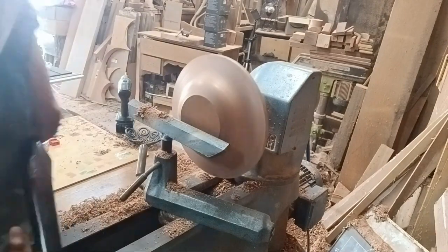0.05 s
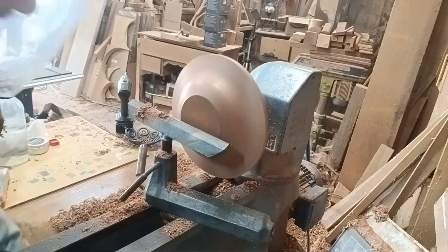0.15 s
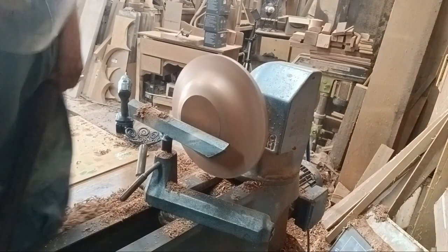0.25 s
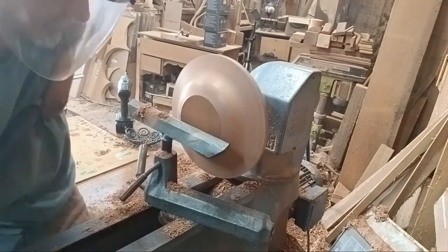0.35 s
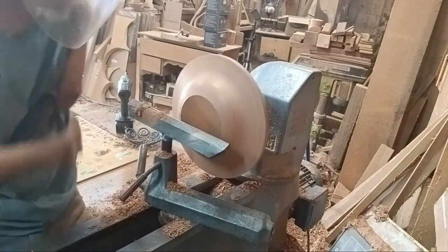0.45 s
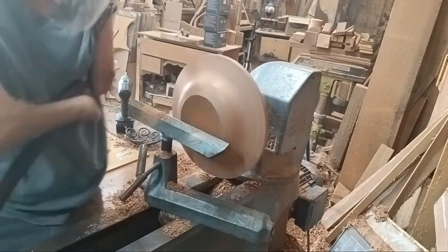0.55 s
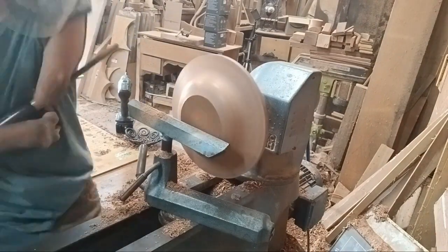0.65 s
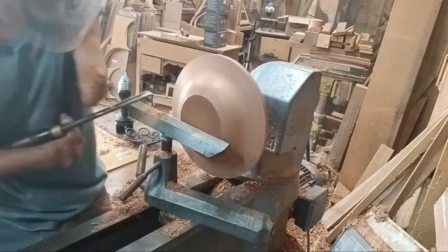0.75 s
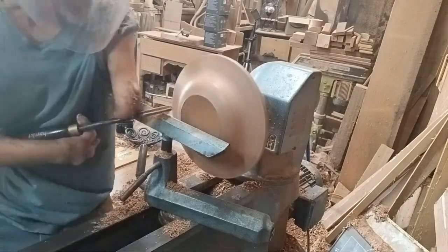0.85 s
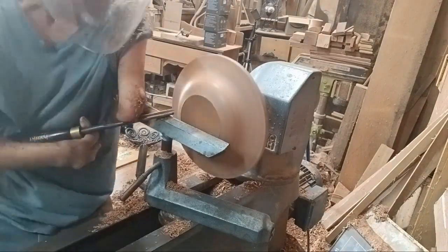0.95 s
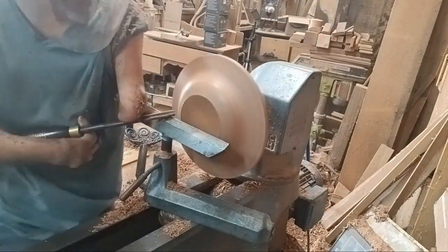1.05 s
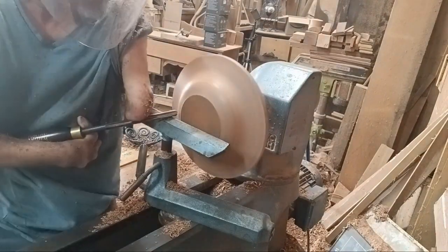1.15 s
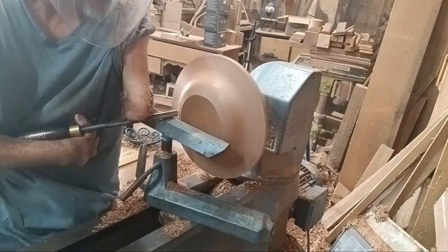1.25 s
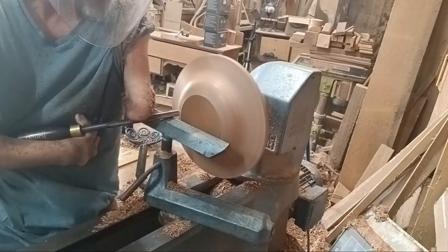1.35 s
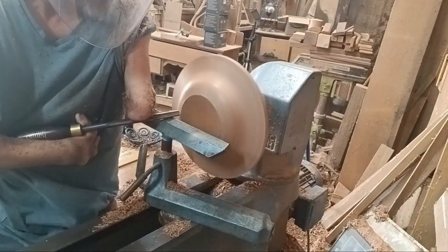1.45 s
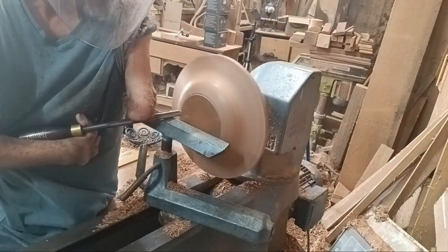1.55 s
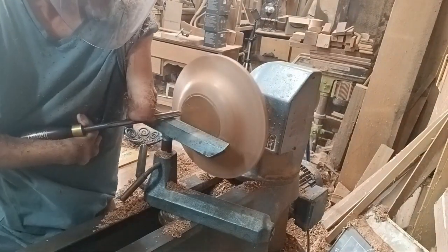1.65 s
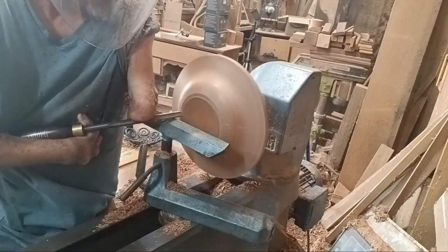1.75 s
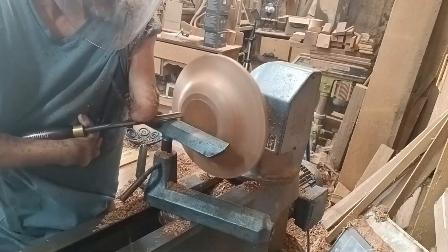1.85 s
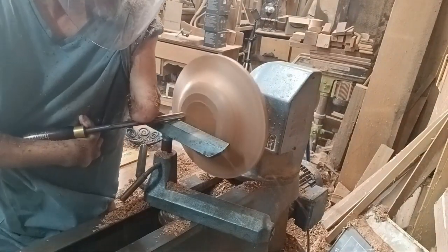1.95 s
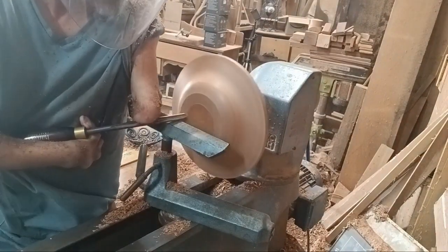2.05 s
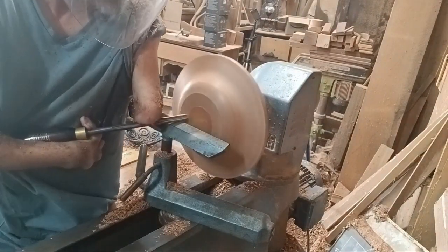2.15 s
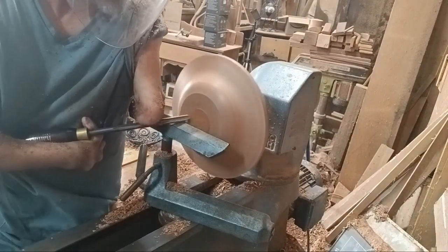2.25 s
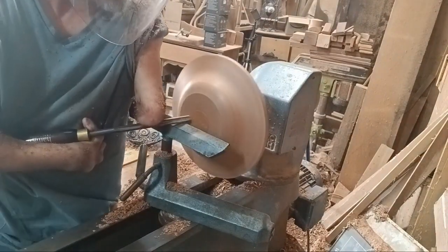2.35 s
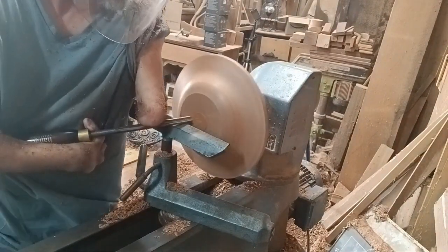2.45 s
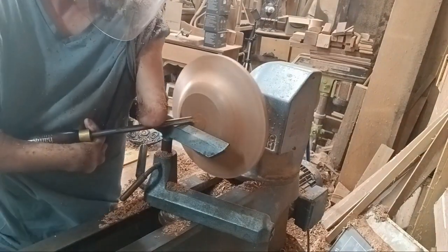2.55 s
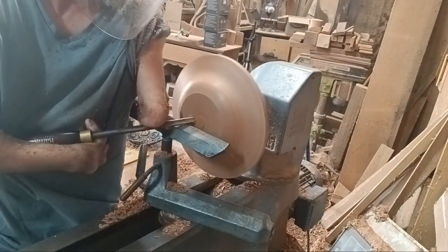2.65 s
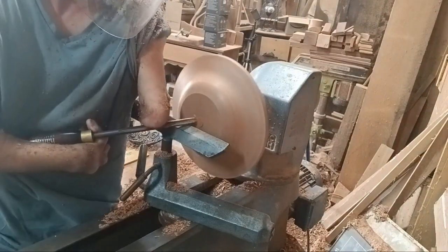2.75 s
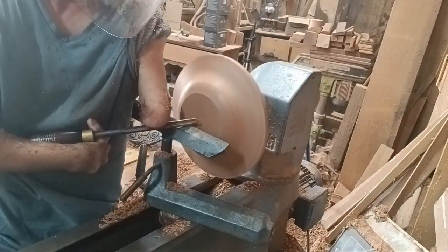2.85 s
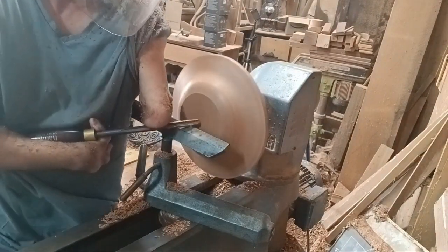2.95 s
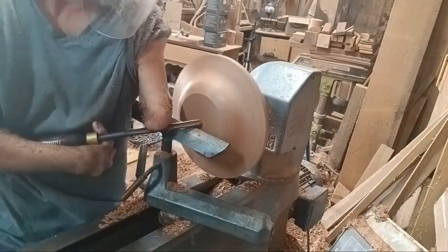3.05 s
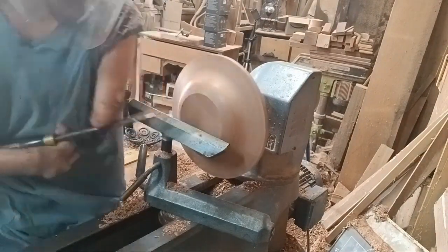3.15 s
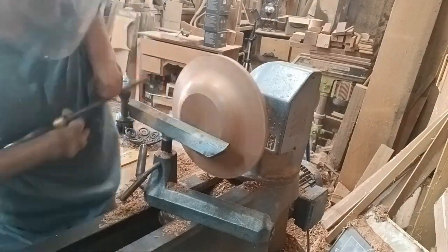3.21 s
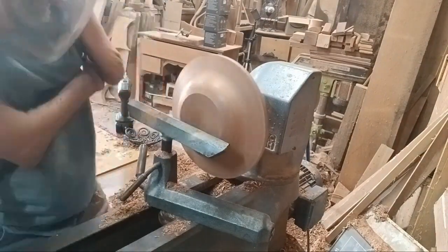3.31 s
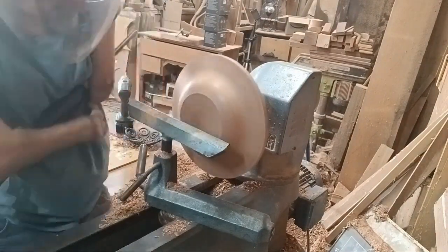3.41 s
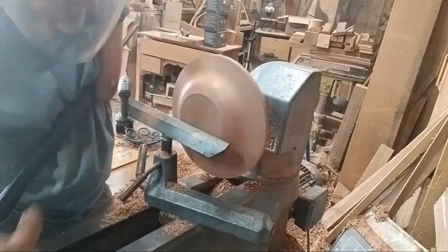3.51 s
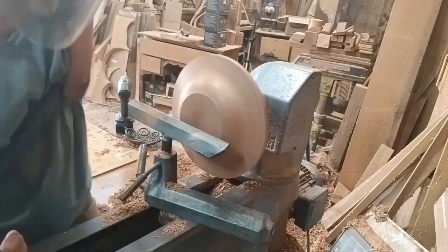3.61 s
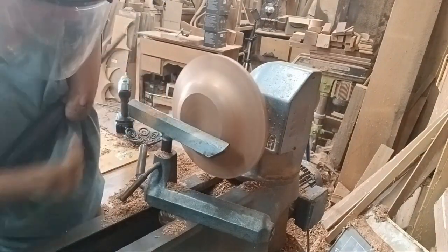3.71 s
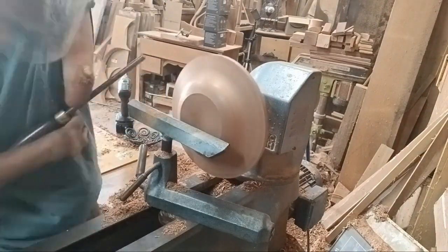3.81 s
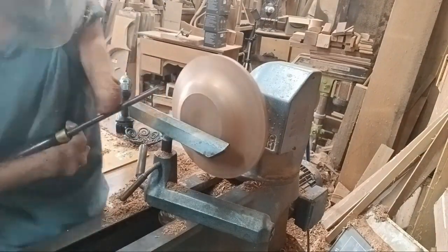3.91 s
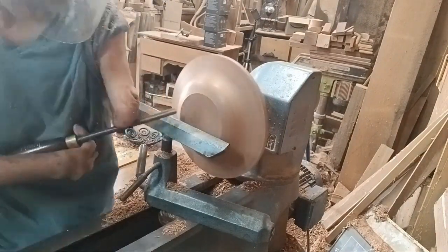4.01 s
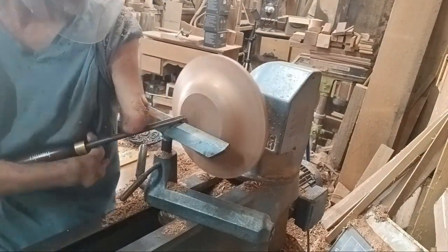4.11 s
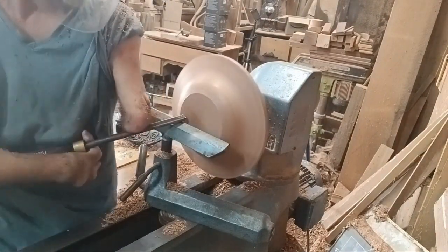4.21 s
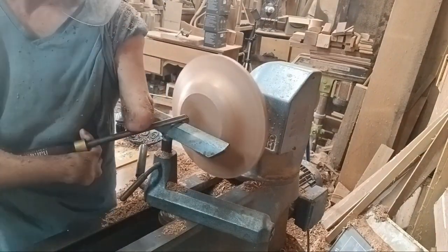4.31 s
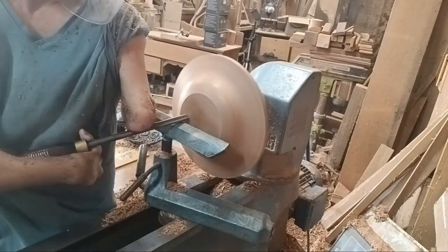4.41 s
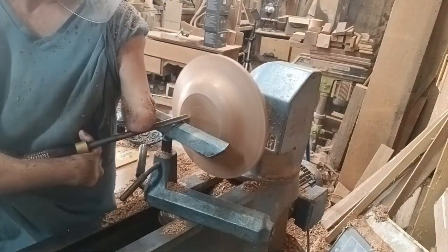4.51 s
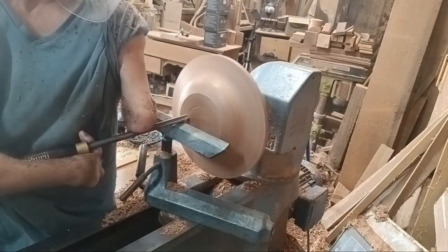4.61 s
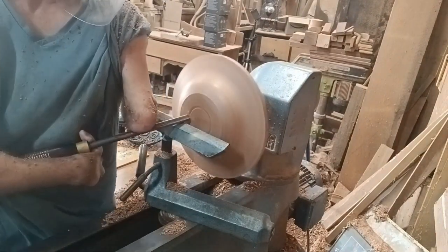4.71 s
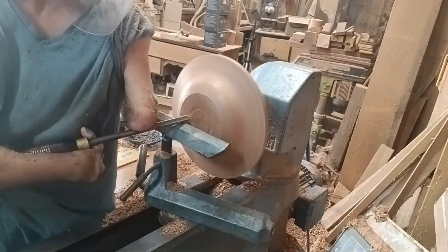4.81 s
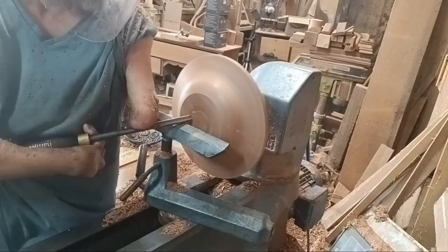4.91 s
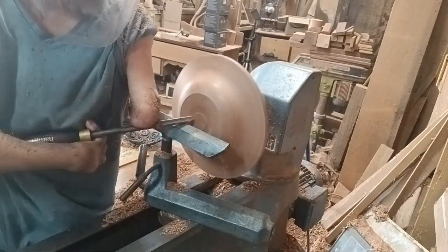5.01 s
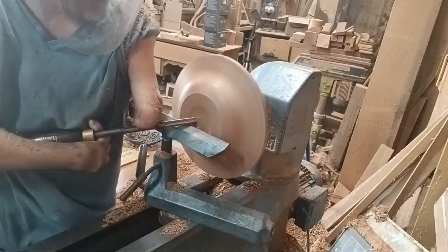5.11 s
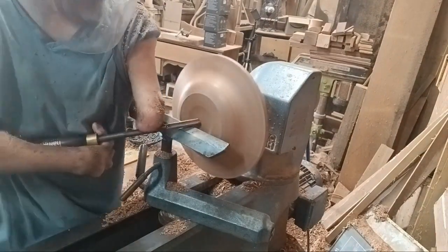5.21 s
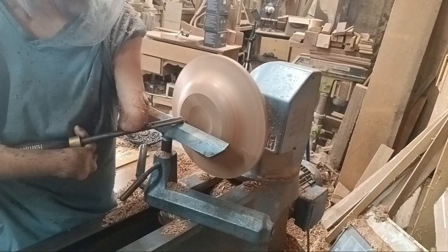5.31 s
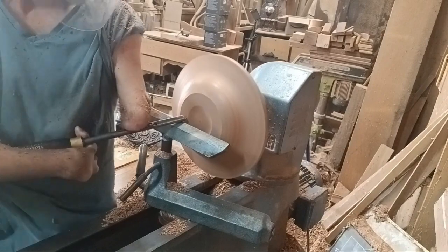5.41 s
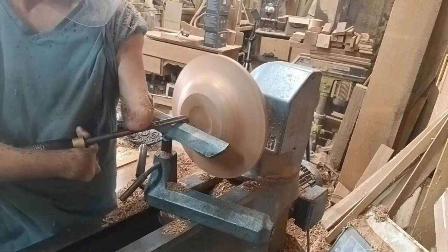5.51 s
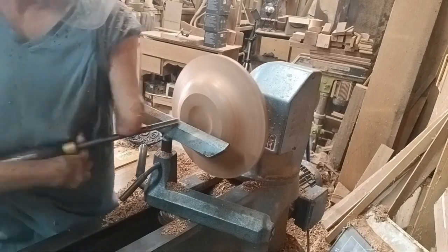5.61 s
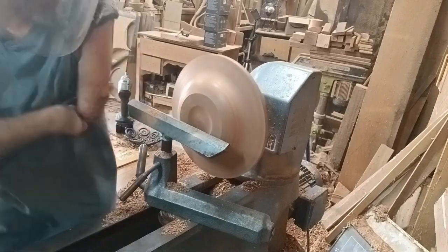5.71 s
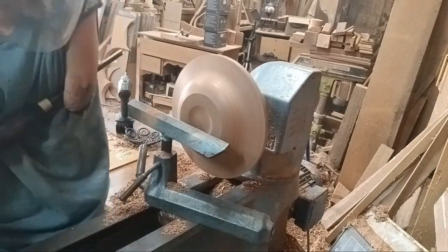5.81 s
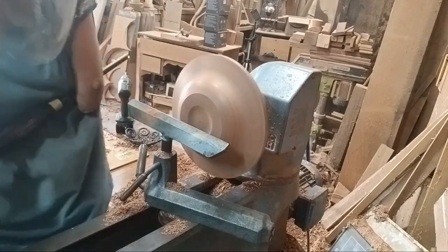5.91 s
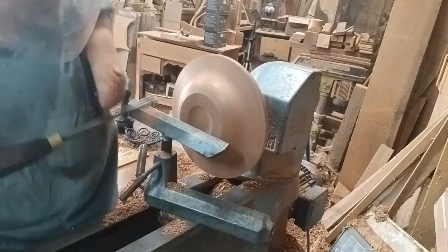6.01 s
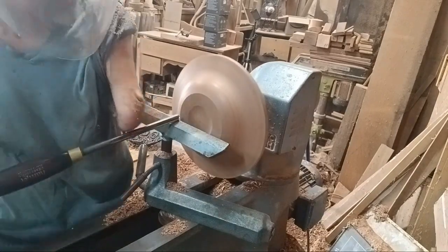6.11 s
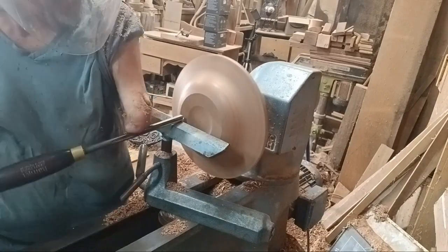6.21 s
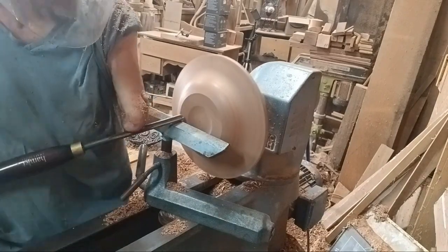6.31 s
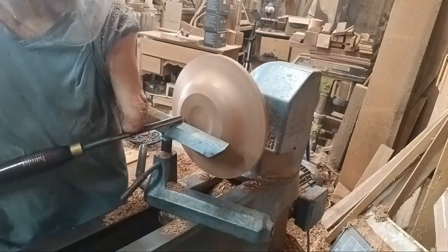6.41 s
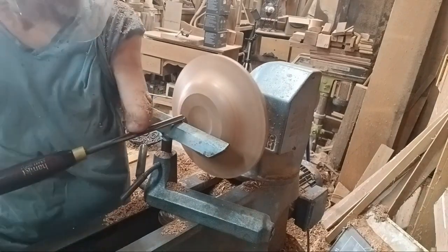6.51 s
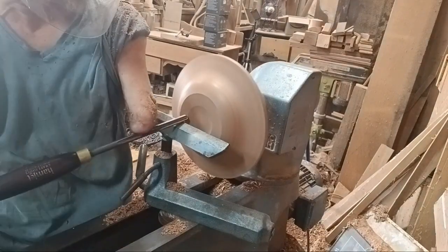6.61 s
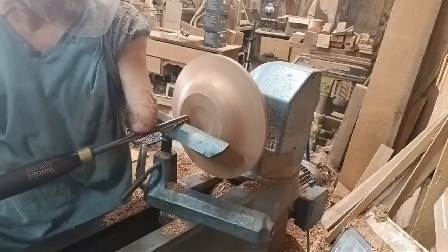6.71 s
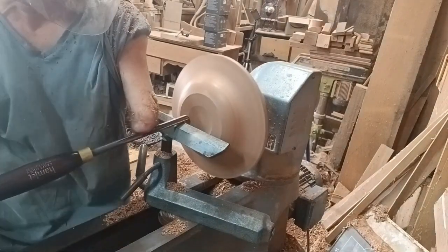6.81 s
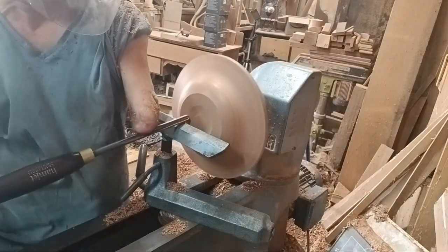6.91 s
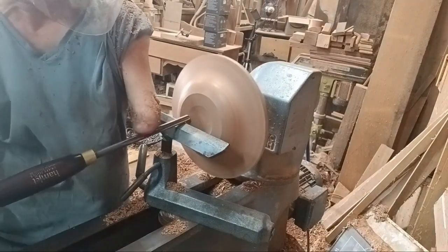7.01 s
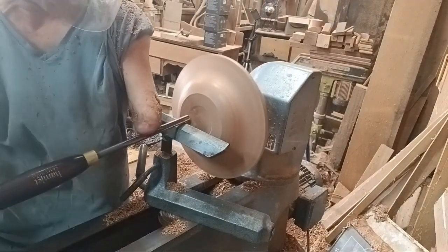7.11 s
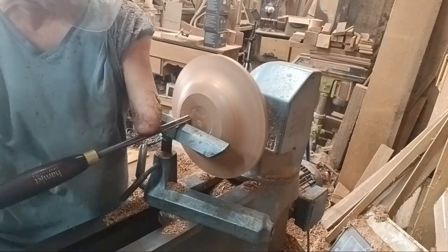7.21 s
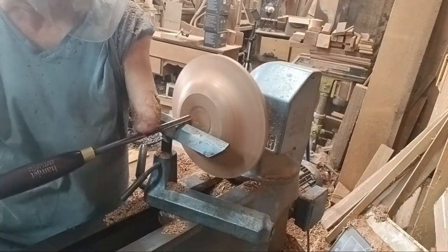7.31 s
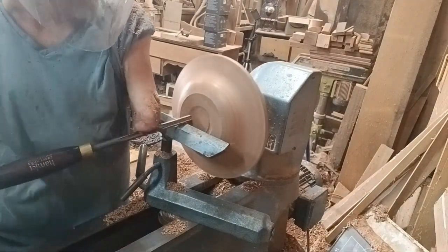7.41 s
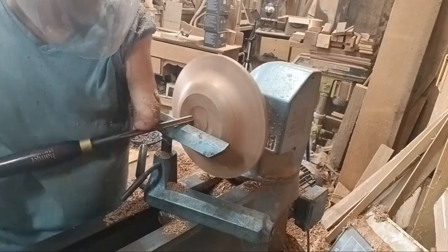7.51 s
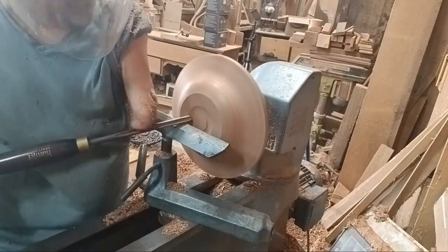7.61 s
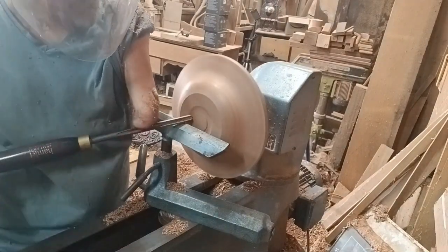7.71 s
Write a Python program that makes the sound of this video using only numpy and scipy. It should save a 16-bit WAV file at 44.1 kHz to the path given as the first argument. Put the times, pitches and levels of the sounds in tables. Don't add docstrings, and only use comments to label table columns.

```python
import sys
import numpy as np
from scipy import signal
from scipy.io import wavfile
from scipy.ndimage import uniform_filter1d

SR = 44100
rng = np.random.default_rng(int(sys.argv[2]) if len(sys.argv) > 2 else 0)


def to_linear_factor(level_db):
    exponent = np.asarray(level_db, float) / 20
    return 10 ** exponent


def file_out(sig):
    cols = np.atleast_2d(sig).T
    lim = np.clip(cols, -1, 1)
    pcm = np.round(lim * 32767).astype(np.int16)
    wavfile.write(sys.argv[1], SR, pcm)


N = 341775
TIME_S = np.arange(N) / SR

# pitch_hz, likeness (0-1)
SAME = [(40, .75), (100, .8), (160, .98), (330, .95), (600, .5), (1000, .55), (2200, .45), (3500, .3),
        (16000, .2)]


def evened(x):
    return x / np.sqrt(np.mean(x ** 2) + 1e-20)


def read(points, hz):
    f, value = np.transpose(points)
    return np.interp(np.log(hz + 1), np.log(f + 1), value)


def passed(x, hz, kind):
    return signal.sosfilt(signal.butter(6, hz, kind, fs=SR, output="sos"), x)


def drift(hz):
    steps = rng.standard_normal(N // 32 + 1)
    slow = signal.sosfiltfilt(signal.butter(2, hz, fs=SR / 32, output="sos"), steps)
    return evened(np.repeat(slow, 32)[:N])


def panned(lr_db):
    return to_linear_factor([[lr_db / 2], [-lr_db / 2]])


def pair(spectrum, balance, lag, patchy_db, direct=0.):
    bin_hz = np.fft.rfftfreq(1024, 1 / SR)
    a, b, c, d, patches = rng.standard_normal((N // 256 + 5, 513, 5)).T
    patches = uniform_filter1d(patches, size=10, axis=0)
    patches = evened(uniform_filter1d(patches, size=10, axis=1))
    same = np.clip(np.maximum(read(SAME, bin_hz), direct), 0, 1)[:, None]
    late = np.exp(-2j * np.pi * bin_hz * lag / SR)[:, None]
    right = a + 1j * b
    left = same * late * right + np.sqrt(1 - same ** 2) * (c + 1j * d)
    tilt_db = np.array([.5, -.5])[:, None, None] * read(balance, bin_hz)[:, None]
    colour_db = read(spectrum, bin_hz)[:, None] + patchy_db * patches + tilt_db
    z = np.array([left, right]) * to_linear_factor(colour_db)
    return evened(signal.istft(z, nperseg=1024, noverlap=768)[1][:, :N])


def ring(x, hz, width):
    r = np.exp(-np.pi * abs(width) / SR)
    angle = 2 * np.pi * hz / SR
    rung = signal.lfilter([1 - r * r], [1, -2 * r * np.cos(angle), r * r], x)
    return rung * np.sin(angle) / (1 + r) * 2


def motor():
    # pitch_hz, level_db (per Hz)
    idle_spectrum = [(22, -34), (45, -64), (95, -29.5), (200, -4), (340, -16), (700, -13), (1200, -11.5),
                     (1700, -10.5), (3100, -9.5), (7200, -18.5), (8700, -17), (10500, -22.5),
                     (14500, -43.5), (16000, -21)]
    # pitch_hz, left_right_db
    idle_balance = [(60, -16), (180, -9), (550, 2), (1650, 1.5), (4970, 2.5), (15000, -14.5)]
    # pitch_hz, width_hz, level_db (rms), steady_share (0-1), left_right_db
    tones = [(48, 14, -49, 0, 1), (64, 12, -49.5, 0, 1), (148, 35, -46, 0, 0), (210, 9, -42.5, .5, 0),
             (296, 24, -48.5, 0, 0), (465, 7, -47.5, .85, 0), (575, 8, -62, .3, 0), (860, 50, -58, 0, 0),
             (937, 8, -54, .6, 8), (7675, 20, -53, .3, 0), (7760, 8, -60, .5, 0), (7835, 12, -47, .8, 0),
             (7914, 14, -41, .85, 0), (8075, 8, -51.5, .8, 0)]
    lag = 21
    stray = .0008
    level_db = -28 - 2.5 + 0.56 * drift(44.0)
    out = to_linear_factor(level_db) * pair(idle_spectrum, idle_balance, lag, patchy_db=1.0)
    noise = rng.standard_normal((2, N))
    clock_s = np.cumsum(1 + stray * np.pad(drift(5.), (0, lag), "edge")) / SR
    for hz, width, db, share, lr_db in tones:
        steady = np.sqrt(2 * share) * np.cos(2 * np.pi * hz * clock_s)
        fuzz = np.sqrt(1 - share) * evened(ring(ring(noise[0], hz, width), hz, 3 * width))
        diffuse_gain = min(np.sqrt(1 - read(SAME, hz) ** 2), .4)
        diffuse = diffuse_gain * evened(ring(noise[1], hz, 2 * width))
        left = np.roll(fuzz, lag) + steady[:N] + diffuse
        right = fuzz + steady[lag:]
        out += to_linear_factor(db) * panned(lr_db) * np.array([left, right])
    return out


def knocks():
    # start_s, level_db (peak), left_right_db, crack_db (over the ring)
    blows = [
        (0.156, -23.5, 2, -10),
        (0.26, -4.5, 6, -9.5),
        (3.101, -16.5, 4, -3),
        (3.91, -23, 6, -12.0),
        (4.069, -10.5, 3.5, 3.5),
        (6.116, -24, 0.5, 3),
    ]
    # pitch_hz, level_db, t60_s
    blow_modes = [
        [(293, 2, 0.058), (403, -3, 0.03)],
        [(372, -22, 0.14), (734, -7, 0.016), (842, -2.5, 0.05), (945, -8.5, 0.063), (1362, 1.5, 0.053),
         (1860, 2, 0.02), (2470, -3, .055), (3220, -4, .05), (4560, -10, .045)],
        [(680, -6, .04), (1130, 0, .045), (1260, -2, .04), (1400, -5, .04), (2500, -3, .04)],
        [(228, -3, 0.053), (510, -10, 0.13), (657, -8, 0.05), (870, -12, .04)],
        [(720, -9, .06), (1170, -2, .05), (1300, -6, .04), (2160, 0, .045), (2560, -9, .03), (2930, 0, .045),
         (4050, -5, .045), (4936, -3, .05), (6400, -5, .045), (8200, -7, .04)],
        [(806, -1, 0.048), (2530, 4, 0.033), (4930, -3, .03)],
    ]
    out, t = np.zeros((2, N)), np.arange(6000) / SR
    phases = np.cumsum(rng.uniform(-1, 1, (len(blows), 2, 10)) * [[np.pi], [1.4]], axis=1)
    cracks = rng.standard_normal((len(blows), 2, len(t)))
    cracks = passed(passed(cracks, 470.0, "high"), 9000.0, "low")
    for (s, db, lr_db, crack_db), modes, phase, crack in zip(blows, blow_modes, phases, cracks):
        hz, mode_db, t60 = np.transpose(modes)[:, :, None]
        swings = np.sin(2 * np.pi * hz * t + phase[:, :len(hz), None])
        sound = (to_linear_factor(mode_db - 60 * t / t60) * swings).sum(1)
        sound *= 1 - np.exp(-t / .003)
        burst = np.exp(-t / .006) * (1 - np.exp(-t / .001))
        sound = sound / abs(sound).max() + crack * to_linear_factor(crack_db) * burst
        at = round(s * SR)
        out[:, at:at + len(t)] += to_linear_factor(db - 1) * panned(lr_db) * sound
    return out


def gouge():
    # time_s, hiss_db (edge pressure), load (on the bowl, 0-1)
    passes = [
        [(1.425, -48, 0.0), (1.444, -23, 0.06), (1.464, -23.5, .05), (1.472, -15.5, 0.11), (1.8, -16, 0.32),
         (2.046, -13, 0.31), (2.8, -14.5, 1.0), (2.945, -24, 0.8), (2.965, -35, 0.06)],
        [(4.37, -47, 0.0), (4.41, -23, .04), (4.56, -18.5, 0.14), (4.6, -13.5, 0.18), (4.78, -13, 0.18),
         (4.89, -16, 0.28), (5.016, -14, 0.65), (5.146, -25.5, 0.68), (5.22, -40, 0.03)],
        [(6.88, -74, 0.24), (6.904, -20, 0.08), (6.98, -16, 0.09), (7.09, -17.5, 0.16), (7.15, -14, 0.23),
         (7.284, -13, 0.2), (7.46, -16, 0.45), (7.565, -17, 0.35), (7.605, -37, .03)],
        [(7.7, -52, 0.0), (7.736, -27, 0.13), (7.75, -19.5, 0.2)],
    ]
    moves_s = [1.95, 3.7, 6.0]
    ring_out_s = .04
    swing_s = 0.046
    s, *controls = np.transpose(sum(passes, []))
    hiss_db, load = (np.interp(TIME_S, s, c) for c in controls)
    load = load.clip(0, 1.2)
    place = np.searchsorted(moves_s, TIME_S).astype(float)
    contact = sum((TIME_S >= p[0][0]) & (TIME_S <= p[-1][0] + ring_out_s) for p in passes)
    touching = uniform_filter1d(contact.astype(float), size=400)
    wall_db = -22 - 21 * np.exp(-load / 0.19) + 0.27 * (hiss_db + 18.5)
    hold = np.exp(-1 / (swing_s * SR))
    swing = signal.lfilter([1 - hold], [1, -hold], load)
    drum_db = -45.5 + 30.5 * swing - 1.5 * (1 - swing) * drift(36.0)
    return touching, hiss_db, wall_db, drum_db, place


def struck(drive, modes_hz, modes_db, place, fickle_db):
    rocking = fickle_db * drift(7.)
    out = 0
    for k, ((hz, width), db) in enumerate(zip(modes_hz, modes_db)):
        level_db = np.interp(place, range(len(db)), db) + np.roll(rocking, k * N // 17)
        out = out + to_linear_factor(level_db) * ring(drive, hz, width)
    return out


def drumming(white, pulse, place):
    upper_share = (.4, .4, 1.1, 1.3)
    drum_hz = 235
    shake = evened(ring(ring(white, drum_hz, 18.), drum_hz, 70.))
    shake /= np.sqrt(uniform_filter1d((shake ** 2).mean(0), size=1500) + 0.69)
    upper = evened(ring(ring(white, 1.2 * drum_hz, 60.), 1.2 * drum_hz, 90.))
    drum = shake * (1 + .4 * pulse) + np.interp(place, range(4), upper_share) * upper
    return passed(drum, 357.0, "low")


def cutting(hiss_db, wall_db, drum_db, place):
    # pitch_hz, level_db (per Hz)
    hiss_spectrum = [(2120, -2.5), (3600, 0), (4130, -7.5), (5280, 0.5), (7850, 5.5), (8360, 3.5),
                     (9130, -1.5), (10000, -4), (11700, -17.5), (14300, -14), (16200, -74)]
    # pitch_hz, level_db (per Hz)
    wall_spectrum = [(330, -52), (560, -55), (839, 7), (1120, -6), (1300, -0.5), (1570, 1.5), (2430, -7),
                     (2620, -1), (4200, -15), (5460, -2), (9240, -120)]
    # pitch_hz, left_right_db
    cut_balance = [(60, 2), (150, 0), (380, -1), (950, 0), (2380, 0), (5500, 5.5), (15000, -8)]
    # pitch_hz, width_hz
    steel_modes = [(4940, 90), (5170, 60), (5425, 55), (5880, 140), (6515, 75), (6918, 60), (7320, 60),
                   (7435, 80), (8240, 90), (8390, 90), (8630, 70), (9810, 100), (9990, 170), (7090, 55),
                   (8880, 90), (6180, 80)]
    # level_db at tool places 0, 1, 2, 3
    steel_levels = [(3, -16, 0.5, 0), (4, -0.5, -14, -3), (-3, 2, -1.5, -1), (-22, -31, 2, 6),
                    (10, -21, 3, 1), (-10, -4, 8, 10), (-20, -8.5, 4, -19), (-14, 5.5, -44, -17),
                    (11, -5, -36, 7), (-4, -17, 5.5, -21), (-31, -26, -24, -2), (1, -11, 3, 6),
                    (-35, 1.5, -17, -8), (-5, 7, -14, -24), (3, -26, -17, -7), (-15, -22, -7, -12)]
    # pitch_hz, width_hz
    wood_modes = [(760, 70), (880, 130), (1030, 60), (1315, 90), (2100, 90), (2445, 55), (3220, 90)]
    # level_db at tool places 0, 1, 2, 3
    wood_levels = [(-4.5, 3, 5.5, -8), (-15, -4.5, -36, 1), (-13, -8, -8, -2), (-17, 0.5, 3, -0.5),
                   (-5.5, -6, -25, 1), (1.5, 4, 11, 7.5), (-7, -17, -0.5, 4)]
    lag = 42
    pulse_hz = 43
    pulse = np.cos(2 * np.pi * pulse_hz * TIME_S + .6 * drift(4.))
    throb = to_linear_factor(1.2 * pulse + 1.2 * drift(50.) + .6 * drift(300.))
    snap_sizes = to_linear_factor(3.2 * np.minimum(rng.exponential(1, N), 4))
    snaps = snap_sizes * (rng.random(N) < 400 / SR)
    bite = throb * (1 + .11 * signal.lfilter([1], [1, -.985], snaps))
    place = uniform_filter1d(place, size=15000)
    white = bite * pair([(20, 0), (20000, 0)], cut_balance, lag, patchy_db=0, direct=.6)
    steel = to_linear_factor(10.) * struck(white, steel_modes, steel_levels, place, 2.5)
    wood = to_linear_factor(13.) * struck(white, wood_modes, wood_levels, place, 2.)
    fibres = bite * pair(hiss_spectrum, cut_balance, lag, patchy_db=0.5)
    hiss = evened(passed(fibres + steel, 1900.0, "high"))
    body = bite * pair(wall_spectrum, cut_balance, lag, patchy_db=1.5)
    wall = evened(passed(body + wood, 702.0, "high"))
    drum = to_linear_factor(drum_db) * evened(drumming(white, pulse, place))
    return to_linear_factor(hiss_db) * hiss + to_linear_factor(wall_db) * wall + passed(drum, 185., "high")


def ducked(idle, touching):
    # start_s, deepest_s, end_s, depth_db
    gain_dips = [
        (1.404, 1.78, 2.08, -28.5),
        (4.557, 4.83, 5.2, -15),
        (7.116, 7.48, 7.64, -11),
    ]
    duck_db = -1.5 * touching
    for start, deepest, end, db in gain_dips:
        arch = np.sin(np.pi / 2 * np.interp(TIME_S, [start, deepest, end], [0, 1, 0]))
        duck_db = duck_db + db * arch ** 0.99
    rumble = signal.sosfiltfilt(signal.butter(4, 115., fs=SR, output="sos"), idle)
    return to_linear_factor(duck_db) * rumble + to_linear_factor(0.38 * duck_db) * (idle - rumble)


def scene():
    touching, hiss_db, wall_db, drum_db, place = gouge()
    cuts = touching * cutting(hiss_db, wall_db, drum_db, place)
    return cuts + ducked(motor(), touching) + knocks()


def roll_off(x):
    return signal.sosfilt(signal.butter(12, 16050, fs=SR, output="sos"), x)


def record(dry):
    thin = signal.sosfilt(signal.butter(2, 36, "high", fs=SR, output="sos"), dry)
    limited = signal.oaconvolve(thin, signal.firwin(511, 15850, fs=SR)[None], "same")
    whistle = to_linear_factor(-58) * np.sqrt(2) * np.cos(2 * np.pi * 15734 * TIME_S)
    mix = np.clip(limited + whistle, -.8, .8)
    return roll_off(mix)


dry = scene()
out = record(dry)
file_out(out)
```